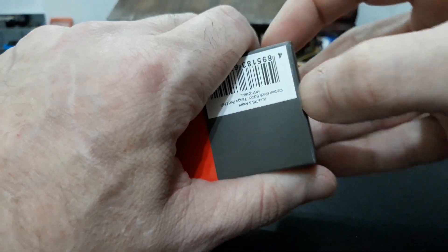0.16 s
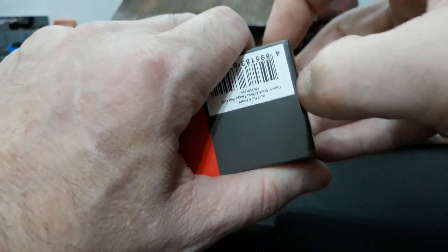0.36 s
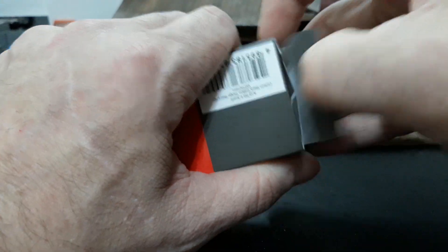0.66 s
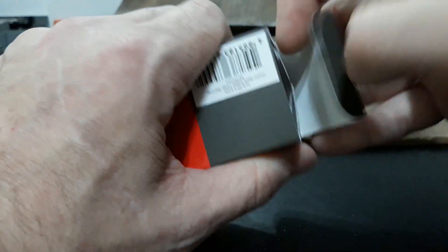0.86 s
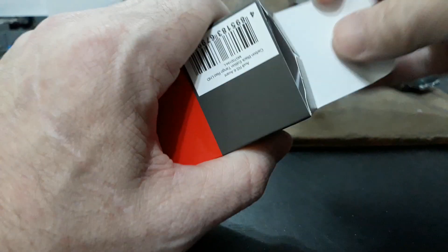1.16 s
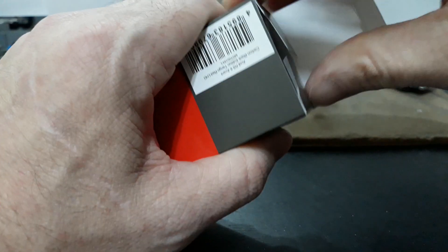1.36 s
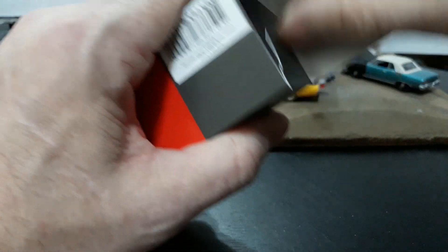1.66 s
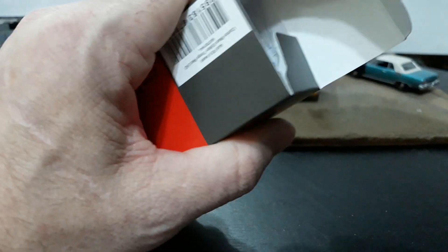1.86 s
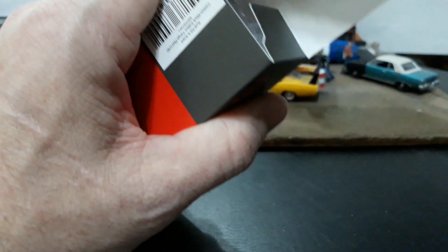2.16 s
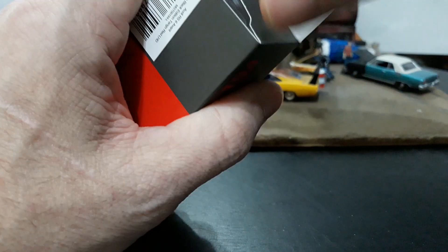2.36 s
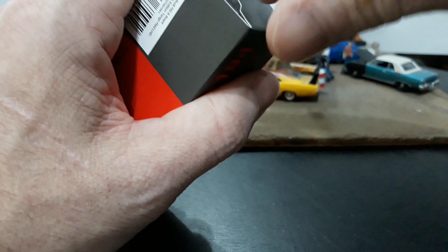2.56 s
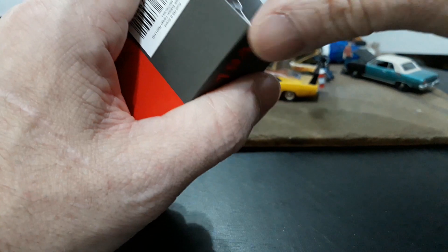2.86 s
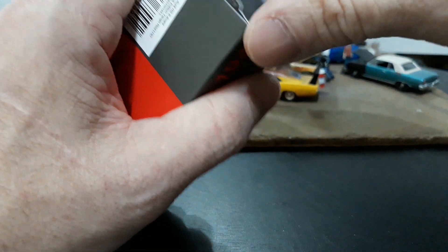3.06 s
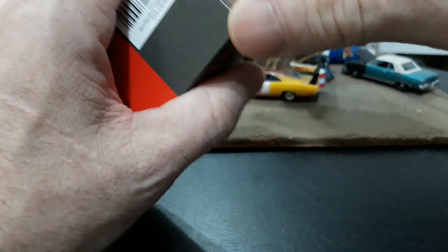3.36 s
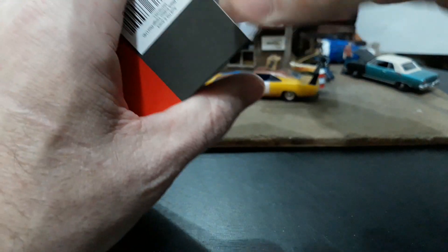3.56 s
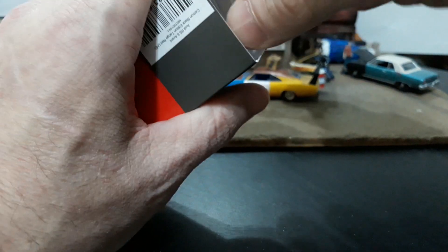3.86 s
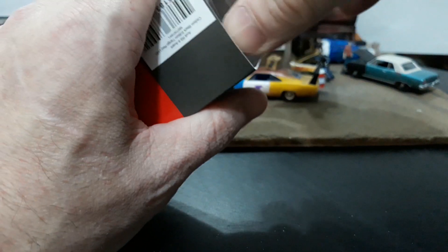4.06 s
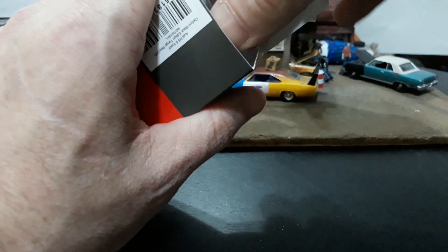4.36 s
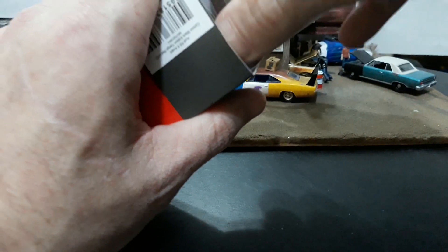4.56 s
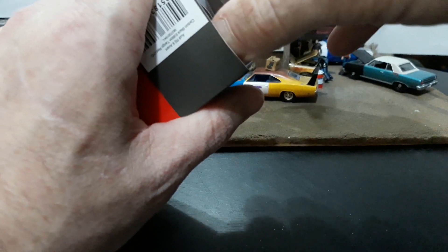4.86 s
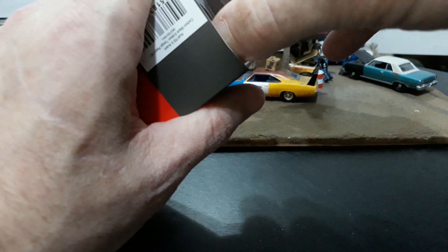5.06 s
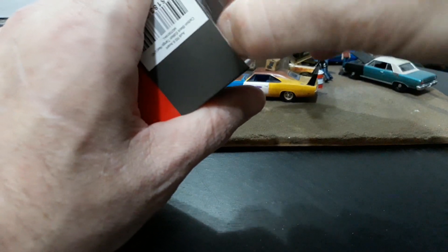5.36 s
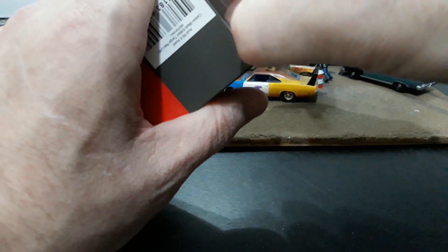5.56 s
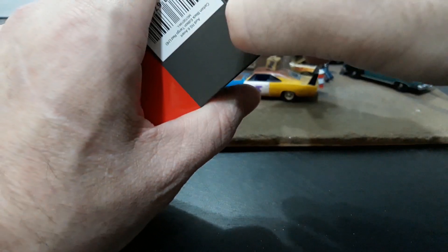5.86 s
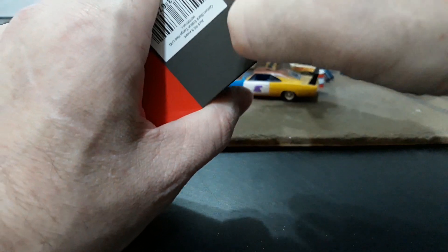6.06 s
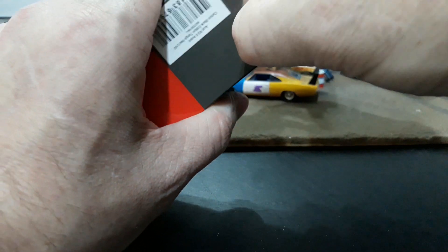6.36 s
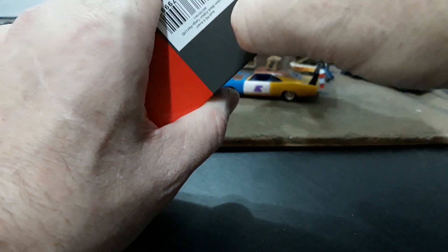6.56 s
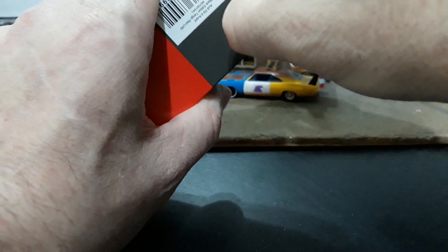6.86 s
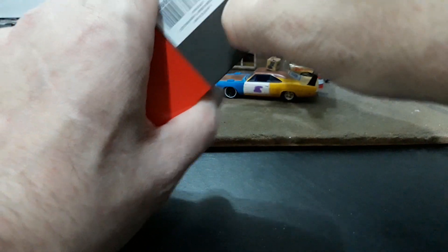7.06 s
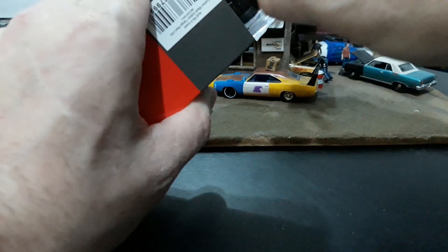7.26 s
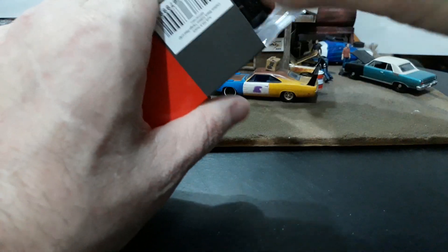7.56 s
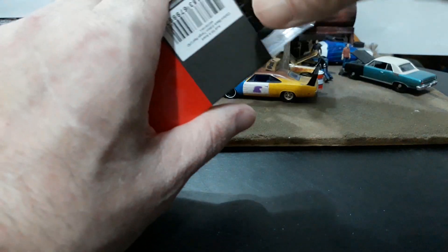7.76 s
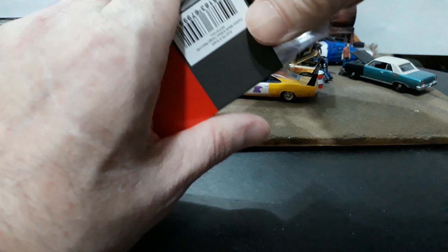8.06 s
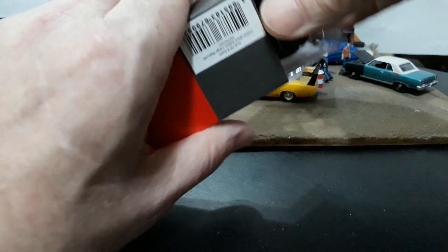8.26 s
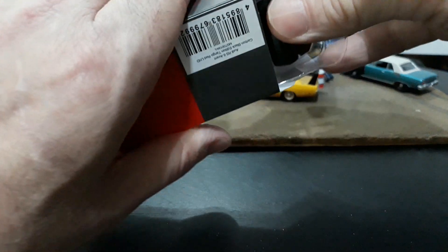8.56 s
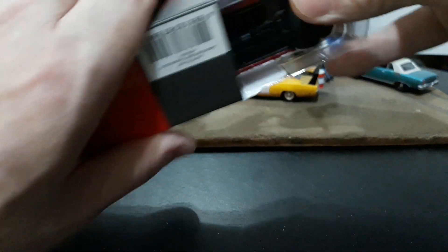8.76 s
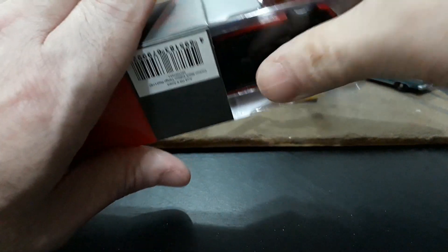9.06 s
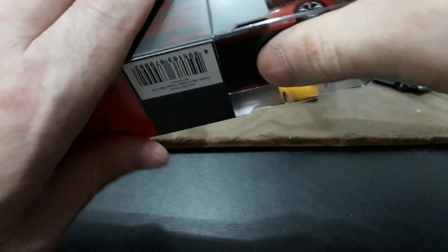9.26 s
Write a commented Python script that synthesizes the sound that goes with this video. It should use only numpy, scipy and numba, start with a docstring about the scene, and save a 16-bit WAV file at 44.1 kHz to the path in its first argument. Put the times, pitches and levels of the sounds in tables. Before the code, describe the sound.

A low, gently wavering hum and faint room hiss sit beneath close handling of a small cardboard box. Soft rubbing swells to a sharp bright snap at 0.5 s, followed by a tight cluster of cracks and a short squeaky scrape until 0.7. Quieter rustling and ticks follow, with a hard snap at 2.05 and a duller, hollow pop at 3.4. Light grainy rubbing and creaks lead to a loud boxy snap at 4.67 and a brighter one at 5.06, with thin squeaks just after. From about 6.4 to 7.1 the scraping grows rough and dense with crackles and knocks, ending in a strong snap at 7.1 and another at 7.36. Smaller plastic clicks continue around 7.8. From 8.3 lower, hollow sliding swells with faint squeaks as the tray is pulled, peaking near 8.8, then scattered ticks until 9.4. The room adds only a short, faint tail.

```python
"""A low wavering hum and a faint room hiss come first, with soft rubbing on card that soon swells.
Hands open a small cardboard box close to a phone and pull a plastic tray out of it, in a quiet furnished room.
Flaps and plastic snap as short noise bursts; fingers and tray rub the card in stick-slip grains.
Snaps and rubbing ring the resonances of the hollow box; dragged edges squeak as narrow gliding noise bands."""
import sys
import numpy as np
from scipy import signal
from scipy.fft import rfft, irfft
from scipy.io import wavfile
from scipy.ndimage import uniform_filter1d, minimum_filter1d
from numba import njit

SR = 44100
rng = np.random.default_rng(int(sys.argv[2]) if len(sys.argv) > 2 else 0)


def materialize(psi):
    """Save the field psi as 16-bit PCM at rate SR to the path in sys.argv[1].

    A 1-D psi becomes a single channel; in a 2-D psi each row is a channel.
    """
    bounded = np.clip(np.atleast_2d(psi).T, -1, 1)
    quanta = np.round(bounded * 32767).astype(np.int16)
    wavfile.write(sys.argv[1], SR, quanta)


N = 414981  # length in samples


def undb(db):
    """Amplitude gain of a level in dB."""
    return 10 ** (np.asarray(db) / 20)


def unit(x):
    """Scale to rms 1."""
    return x / np.sqrt(np.mean(x ** 2))


def curves(table):
    """Columns of a table joined by straight lines, one value a sample."""
    times, *columns = np.transpose(table)
    return [np.interp(np.arange(N) / SR, times, column) for column in columns]


def walk(rate):
    """Random drift: levels held 1 / rate s, slewed twice, with rms 1."""
    hold = int(SR / rate)
    steps = np.repeat(rng.standard_normal(N // hold + 1), hold)
    return unit(uniform_filter1d(uniform_filter1d(steps, hold), hold)[:N])


@njit
def svf(x, hz, width):
    """State-variable band-pass with a moving centre, gain 1 at the centre."""
    y, band_state, low_state = np.empty(len(x)), 0., 0.
    for i in range(len(x)):
        g, damping = np.tan(np.pi * hz[i] / SR), width[i] / hz[i]
        v = (band_state + g * (x[i] - low_state)) / (1 + g * (g + damping))
        band_state, low_state, y[i] = 2 * v - band_state, low_state + 2 * g * v, damping * v
    return y


def band(x, hz, width):
    """Band-pass at a fixed or moving centre."""
    one = np.ones(len(x))
    return svf(x + 1e-18, np.clip(hz * one, 20, .45 * SR), width * one)


def band_twice(x, hz, width):
    """The same band-pass twice, for steeper skirts."""
    return band(band(x, hz, width), hz, width)


def fine(x, hz=6500):
    """Only the top treble, falling towards the top, with two small bright resonances."""
    high_pass = signal.butter(3, hz, "high", fs=SR, output="sos")
    top = signal.sosfilt(high_pass, band(band(x, 8100, 8800), 8000, 16000))
    return top + 0.37 * band(x, 9350, 1200) + 0.43 * band(x, 14000, 1600)


# spectrum of the room hiss: (f/Hz, relative level/dB)
HISS_SPECTRUM = [(20, -43), (60, -17), (110, -7), (220, -9), (600, -9), (1800, -44.5), (3300, -34.5),
                 (5000, -26), (16000, -63)]
HISS_DB = -55.5  # rms


def room_hiss():
    """Steady noise shaped by a spectrum drawn over log frequency."""
    hz = np.fft.rfftfreq(N, 1 / SR) + 1
    shape_hz, shape_db = np.transpose(HISS_SPECTRUM)
    gain = undb(np.interp(np.log(hz), np.log(shape_hz), shape_db))
    return undb(HISS_DB) * unit(irfft(rfft(rng.standard_normal(N)) * gain, N))


# hum tones: (f/Hz, rms level before waver and swell/dB, level waver/dB, pitch waver/Hz)
HUM_TONES = [(98.8, -60, 1.5, .4), (116, -58, 2.5, .6)]
# slow swell of the whole hum: (t/s, level/dB)
HUM_SWELL = [(0, -3), (1.3, -4), (2, 0), (3.7, 3), (5.6, -3), (7.2, 2.5), (9.41, 1.5)]


def low_hum():
    """Two low sine tones, each wavering in level and pitch, swell slowly together."""
    hum = np.zeros(N)
    for hz, db, waver_db, drift_hz in HUM_TONES:
        level = undb(db + waver_db * walk(13.0))
        phase = 2 * np.pi * np.cumsum(hz + drift_hz * walk(4.1)) / SR
        hum += level * np.sqrt(2) * np.sin(phase)
    return hum * undb(curves(HUM_SWELL)[0])


# bands of the room tail: (f/Hz, time to fall 60 dB/s, relative level/dB)
ROOM_BANDS = [(494, 0.36, -22.5), (1440, 0.36, -26), (4000, 0.33, -15.5), (10800, 0.22, -19.5)]


def room(x):
    """Diffuse tail that swells in over 11 ms and dies faster in the treble."""
    t = np.arange(SR // 2) / SR
    tail = np.zeros(len(t))
    for hz, t60, db in ROOM_BANDS:
        noise = unit(band(rng.standard_normal(len(t)), hz, 0.84 * hz))
        tail += undb(db) * noise * undb(-60 * t / t60) / np.sqrt(t60 * SR / 14)
    return signal.fftconvolve(x, tail * np.clip(t / 0.011, 0, 1) ** 2)[:N]


# resonances of the box walls and cavity: (f/Hz, width/Hz, level/dB)
BOX_MODES = [(182, 115, -6), (332, 80, 0), (503, 111, -1), (696, 101, -1), (883, 107, -7.5),
             (1172, 130, -3.5), (1610, 125, -4.5), (2155, 80, -18), (2530, 30, -8.5), (1961, 383, -2),
             (2190, 1470, -12.5)]


def box(push):
    """The walls and the cavity ring after every push, with polarity alternating in table order."""
    return sum((-1) ** k * undb(db) * band(push, hz, width)
               for k, (hz, width, db) in enumerate(BOX_MODES))


# edges that squeak as they drag: (t/s, length/s, start f/Hz, end f/Hz, nominal level/dB)
SQUEAKS = [(0.509, 0.086, 3750, 3700, -42.5), (0.623, 0.094, 5100, 4700, -33.5),
           (0.68, 0.0079, 5930, 5540, -6.5), (0.698, 0.081, 5900, 5700, -54),
           (0.705, 0.069, 3200, 3310, -38), (0.689, 0.015, 4280, 4360, -22.5),
           (0.698, 0.13, 4350, 4360, -45), (4.07, 0.09, 5350, 5300, -54), (5.069, 0.034, 3950, 4030, -32),
           (5.098, 0.11, 4770, 5130, -37), (5.194, 0.049, 5000, 5100, -34.5),
           (5.248, 0.07, 4900, 5220, -33.5), (6.522, 0.033, 3300, 2860, -29),
           (8.297, 0.15, 2330, 2500, -41), (8.648, 0.16, 2400, 2390, -37), (8.62, 0.15, 1750, 1750, -45)]


def squeaks():
    """A dragged edge slips at a nearly even rate: a rough narrow tone with weaker, wider overtones."""
    out = np.zeros(N)
    noise = rng.standard_normal((len(SQUEAKS), 8192))
    for (start, length, start_hz, end_hz, db), grit in zip(SQUEAKS, noise):
        grit = grit[:int(length * SR)]
        hz = np.linspace(start_hz, end_hz, len(grit))
        # pitch ratio, width as a share of the main pitch, gain
        tone = sum(gain * unit(band_twice(grit, ratio * hz, share * hz))
                   for ratio, share, gain in ((1, 0.12, 0.81), (1.85, .25, 0.35), (2.8, 0.56, 0.2)))
        chatter = 1 + 0.54 * np.sin(2 * np.pi * 110 * np.arange(len(grit)) / SR)
        at = int(start * SR)
        out[at:at + len(grit)] += undb(db) * tone * chatter * signal.windows.tukey(len(grit), .6)
    return out


# strokes of fingers, flaps and tray over the card:
# (peak t/s, rise/s, fall/s, box ring level/dB, rasp level/dB); rise and fall last at least 5 ms
STROKES = [(0.232, 0.24, 0.53, -55, -65), (0.528, 0.048, 0.063, -27.5, -32), (0.692, 0.23, 0.083, -29, -29),
           (0.784, 0.064, 0.78, -45.5, -47.5), (1.197, 0.66, 0.076, -58, -52.5),
           (1.499, 0.43, 0.13, -47.5, -48), (1.626, 0.26, 0.16, -41.5, -48.5),
           (1.745, 0.13, 0.33, -43, -40), (1.881, 0.2, 0.54, -49, -39.5), (2.065, 0.12, 0.46, -40, -44),
           (2.258, 0.24, 0.084, -43, -39.5), (2.42, 0.14, 0.25, -50, -47.5),
           (2.699, 0.016, 0.28, -37.5, -41.5), (2.925, 0.043, 0.18, -35.5, -42),
           (3.04, 0.02, 0.24, -42, -42), (3.149, 0.075, 0.079, -42.5, -43), (3.293, 0.2, 0.23, -53, -46),
           (3.422, 0.039, 0.39, -48, -45), (3.836, 0.36, 0.61, -45.5, -44),
           (4.275, 0.65, 0.19, -46.5, -42.5), (4.401, 0.14, 0.14, -36, -40),
           (4.59, 0.34, 0.094, -42.5, -43.5), (4.68, 0.082, 0.21, -27, -30),
           (5.078, 0.071, 0.35, -42, -38.5), (5.32, 0.46, 0.2, -47.5, -44), (5.423, 0.036, 1, -46.5, -59),
           (5.542, 0.025, 0.22, -62, -41), (5.771, 0.074, 0.22, -36.5, -43.5),
           (5.927, 0.094, 0.09, -42.5, -43.5), (6.024, 0.096, 0.24, -38, -46),
           (6.087, 0.014, 0.43, -33.5, -38), (6.319, 0.016, 0.58, -38, -41),
           (6.38, 0.025, 0.11, -31.5, -32), (6.516, 0.15, 0.41, -30.5, -33.5), (6.705, 0.19, 1.2, -36, -39),
           (7.086, 0.24, 0.32, -24.5, -26.5), (7.388, 0.23, 0.8, -62, -46), (7.673, 0.15, 0.09, -45, -43.5),
           (7.817, 0.07, 0.11, -43.5, -34.5), (8.013, 0.24, 0.33, -39.5, -39),
           (8.156, 0.061, 0.39, -54, -41), (8.28, 0.068, 4.8, -37.5, -41), (8.79, 1.32, 0.19, -27, -34),
           (8.886, 0.072, 0.034, -42, -30), (9.094, 0.15, 0.18, -45, -34),
           (9.199, 0.015, 0.48, -33.5, -33.5)]
STROKE_DEPTH_DB = 34  # a stroke gains this much in its rise time and loses it in its fall time
RESTING_RING_DB, RESTING_RASP_DB = -62, -70  # hands that only hold the box


def stroke_levels():
    """Ring and rasp levels in dB: each stroke climbs to its peak and dies away, over the resting hands."""
    t = np.arange(0, N, 64) / SR
    peak, rise, fall, ring_db, rasp_db = np.transpose(STROKES)[:, :, None]
    before, after = (peak - t) / np.maximum(rise, .005), (t - peak) / np.maximum(fall, .005)
    shape_db = -STROKE_DEPTH_DB * np.maximum(before, after)
    levels = []
    for db, rest_db in ((ring_db, RESTING_RING_DB), (rasp_db, RESTING_RASP_DB)):
        power = np.sum(undb(db + shape_db) ** 2, axis=0) + undb(rest_db) ** 2
        levels.append(np.interp(np.arange(N) / SR, t, 10 * np.log10(power)))
    return levels


# how the grip colours the rubbing: (t/s, mean contact f/Hz, mean rasp f/Hz,
# grain spread before its limits/dB, fine hiss level over the rasp/dB)
GRIP = [(0, 1270, 4630, 7.5, 2), (.62, 1206, 4660, 2, -9), (.9, 1200, 4400, 0.5, -1.5),
        (1.25, 1244, 4460, 0.5, -2), (1.8, 965, 4150, 3, -8.5), (2.1, 1000, 4700, 4, -2),
        (2.6, 1046, 4150, -4.5, -11), (2.75, 1500, 2200, -2, -8), (2.95, 800, 2400, -2, -16),
        (3.05, 1500, 3080, -2, -3.5), (3.2, 1060, 3500, 4.5, -4), (3.5, 940, 2960, -15.5, -8),
        (3.8, 1120, 4940, 1.5, -9.5), (4.25, 1170, 4050, 3, -7.5), (4.5, 1405, 4700, 6, -8),
        (4.7, 1224, 2840, 15.5, -11.5), (5.1, 1200, 4180, 1.3, 0), (5.3, 1250, 4790, -3, 0.5),
        (5.56, 1200, 5040, 2.5, -2), (5.8, 1230, 4450, 5.5, -13), (6.12, 1200, 5900, 1.5, -5),
        (6.35, 1185, 2770, 3.5, -5.5), (6.55, 1270, 6300, 7.5, -8.5), (7.1, 1170, 2430, 2, -7),
        (7.5, 1036, 4530, 1, -10), (8.4, 1067, 4160, 3.5, -14.5), (8.7, 767, 4130, 0.8, -10),
        (8.88, 940, 4170, 2, -10.5), (9.1, 825, 4150, 7, -10), (9.41, 1114, 4840, 0.5, -8)]
SLIPS_PER_S, SLIP_S = 400, 0.0023  # mean rate and decay time of the slips


def rubbing():
    """Surfaces stick and slip: dense grains of uneven size, in clusters, scrape the box."""
    ring_db, rasp_db = stroke_levels()
    contact_hz, rasp_hz, spread_db, hiss_db = curves(GRIP)
    spread_db = np.clip(spread_db, .5, 3.2)
    contact_hz = contact_hz * undb(1.0 * walk(14))  # the touching spot wanders over the card
    sizes = np.minimum(rng.exponential(size=N), 2.5)
    slips = (rng.random(N) < SLIPS_PER_S / SR) * (undb(spread_db * sizes) - 1)
    smear = signal.lfilter([1], [1, -np.exp(-1 / (SLIP_S * SR))], slips)  # every slip lasts a moment
    force = (.3 + smear) * undb(.5 * spread_db * walk(45))
    force = force / np.sqrt(uniform_filter1d(force ** 2, size=6144))  # strokes set the slow level
    low, mid, high, top = force * rng.standard_normal((4, N))
    ring = box(band_twice(low, contact_hz, .75 * contact_hz) + .05 * low)
    edge = band(high, rasp_hz * (1 + .04 * walk(12)), .2 * rasp_hz)
    rasp = 1.26 * edge + 1.095 * band_twice(mid, 2060, 2000) + 1.19 * box(mid)
    layers = ((ring, ring_db), (rasp, rasp_db), (fine(top), rasp_db + hiss_db))
    return sum(undb(db + .5 * spread_db * walk(25)) * unit(x) for x, db in layers)


# small creaks and ticks of the strained wall:
# (t/s, crack peak level/dB, box ring peak level/dB, tick peak level/dB)
CREAKS = [(0.458, -38, -48, -37), (0.833, -35, -30.5, -29), (0.868, -37, -32.5, -25),
          (0.886, -28, -38, -36), (1.156, -37, -34.5, -33), (1.198, -39, -37, -34),
          (1.312, -36.5, -45, -36.5), (1.851, -39, -26.5, -27), (1.898, -37, -29, -30),
          (2.093, -31, -30, -35), (2.124, -23, -26, -20), (2.139, -32, -38, -28),
          (2.198, -24.5, -29.5, -24), (2.263, -27.5, -29.5, -23.5), (2.553, -34, -35.5, -34.5),
          (2.678, -22, -33, -40), (2.787, -29.5, -28.5, -36), (2.901, -40, -30, -33),
          (3.169, -23.5, -29, -29), (3.552, -34.5, -32.5, -32.5), (3.726, -33, -33, -33),
          (3.822, -37, -31, -28), (3.84, -26, -29.5, -36), (3.943, -32, -29.5, -31), (4.126, -29, -34, -32),
          (4.199, -31.5, -36, -33), (4.32, -47, -30.5, -55), (4.352, -27, -48, -31),
          (4.381, -33, -28.5, -37), (4.395, -31, -38, -35), (4.569, -44, -31, -43),
          (4.591, -34, -26.5, -47), (4.633, -32, -55.5, -31), (5.039, -41, -23, -35),
          (5.626, -41, -29, -63), (5.728, -32, -29, -37), (5.796, -25, -32.5, -41), (5.882, -28, -34, -36),
          (6, -30, -35, -39), (6.026, -24, -19, -27), (6.039, -28, -23, -28), (6.179, -22, -27, -24.5),
          (6.209, -28, -27, -38), (6.259, -27, -26.5, -31), (6.443, -17, -18, -38),
          (6.473, -13.5, -18.5, -27), (6.49, -28, -27, -28), (6.496, -20, -8.5, -14), (6.52, -16, -38, -28),
          (6.554, -28, -28, -40), (6.564, -23, -18, -28), (6.576, -15.5, -17, -36), (6.608, -21, -15, -25),
          (6.622, -18.5, -18.5, -41), (6.669, -21, -18.5, -21.5), (6.689, -24, -21, -38),
          (6.703, -21, -14.5, -30), (6.718, -26, -23, -29), (6.743, -18, -29, -32),
          (6.774, -20.5, -28, -31), (6.802, -20.5, -22, -25), (6.826, -19.5, -20, -20.5),
          (6.868, -18, -17, -23.5), (6.896, -21, -19, -22.5), (6.95, -21, -18, -19), (6.993, -19, -18, -39),
          (7.015, -18, -17, -26), (7.244, -29, -28.5, -28), (7.559, -34, -36, -42),
          (7.599, -27.5, -26.5, -35), (7.649, -30, -31, -31), (7.742, -28.5, -17.5, -40),
          (7.959, -24, -28, -41), (8.13, -23.5, -31, -33), (8.411, -28, -22, -27), (8.439, -25, -43, -31),
          (8.452, -18.5, -25, -27), (8.49, -21, -22, -27), (8.521, -18, -16.5, -34), (8.561, -19, -22, -29),
          (8.862, -25, -30, -21), (8.942, -59, -30, -50), (9.334, -26, -46, -17), (9.355, -16, -39, -19)]
CREAK_HZ, CREAK_CONTACT_HZ = 2596, 1207  # median crack pitch, contact pitch
CREAK_SCATTER = 0.21  # random spread of the crack pitch, as a share
# snaps of card and plastic:
# (t/s, crack peak level/dB, box ring peak level/dB, tick peak level/dB, crack f/Hz, contact f/Hz)
SNAPS = [(0.213, -26.5, -29.5, -31, 2140, 1320), (0.511, -2, -12, -5.5, 5070, 894),
         (0.621, -21, -24, -36, 5150, 1170), (0.665, -25, -27, -23, 4970, 1160),
         (0.676, -10, -21, -26, 3250, 1200), (0.681, -4, -34, -21, 5730, 1210),
         (0.688, -7, -18, -29, 4300, 754), (0.694, -10, -42, -25, 4420, 1210),
         (1.214, -26.5, -29, -54, 5100, 1280), (1.834, -27, -31, -30, 4540, 1150),
         (1.872, -17.5, -25, -21, 3860, 550), (1.935, -21.5, -36, -46, 3700, 1130),
         (1.997, -20, -58, -53, 4400, 1600), (2.045, -0.5, -30, -4, 4800, 1580),
         (2.112, -23, -26.5, -21, 4900, 1180), (2.179, -23, -26, -51, 3840, 1130),
         (2.408, -25, -30.5, -28, 4500, 1170), (2.671, -21, -19.5, -40, 4750, 1090),
         (2.913, -14, -19.5, -32, 2350, 860), (3.16, -37, -20, -37, 1990, 960),
         (3.401, -8.5, -14.5, -31, 1490, 730), (4.648, -28, -18, -19, 2400, 1130),
         (4.665, -1.5, -3.5, -3, 2640, 1356), (5.058, -1.5, -13, 0.5, 3840, 1180),
         (5.396, -21, -24, -15, 2770, 1190), (7.065, -9, -14.5, -42, 2080, 1830),
         (7.087, -21, -26, -31, 2630, 1190), (7.109, -1.5, -2.5, -13, 2700, 1570),
         (7.225, -11.5, -23, -16, 4460, 1480), (7.228, -14.5, -23, -14, 4600, 1300),
         (7.364, -5, -7.5, -9, 3200, 1170), (7.366, -24, -16.5, -40, 2350, 440),
         (7.385, -40, -20.5, -40, 3020, 1025), (7.676, -37, -24.5, -27, 2340, 1130),
         (7.807, -14, -48, -18.5, 4740, 1520), (7.87, -15, -15.5, -22.5, 2430, 1370),
         (7.889, -20, -18.5, -21, 4450, 755), (7.923, -23, -32, -26, 3660, 523),
         (8.078, -18.5, -22, -35, 3700, 523), (8.594, -13.5, -23.5, -55, 2460, 710),
         (8.788, -19, -29, -23, 4230, 730), (8.834, -19, -16.5, -25, 2030, 1810),
         (8.981, -23.5, -24, -33, 3520, 1160), (9.038, -31, -25, -36, 3310, 897),
         (9.069, -25, -21, -34, 3000, 1295), (9.078, -16, -20.5, -21.5, 4040, 430),
         (9.194, -32, -25, -27, 4800, 960), (9.121, -34, -21.5, -24, 4520, 1150),
         (9.258, -17, -26, -33, 2760, 1920), (9.302, -18.5, -34, -30, 4860, 1194),
         (9.326, -18, -41, -32, 2750, 1500), (9.387, -12, -24.5, -13.5, 4800, 1130)]


def snaps():
    """Splintering bursts crack, tick and knock the box: snaps at listed pitches, creaks scattered round one."""
    size = 2048
    t, out = np.arange(size) / SR, np.zeros(N + size)
    pitch = CREAK_HZ * np.exp(CREAK_SCATTER * rng.standard_normal(len(CREAKS)))
    # the last three columns: attack s, decay s, width of the contact as a share of its pitch
    events = [(*row, .00025, .0018, .8) for row in SNAPS]
    events += [(*row, hz, CREAK_CONTACT_HZ, .0003, .003, .4) for row, hz in zip(CREAKS, pitch)]
    noise = rng.standard_normal((len(events), size))
    for event, grit in zip(events, noise):
        start, crack_db, ring_db, tick_db, crack_hz, contact_hz, attack, decay, share = event
        splinter = (1 - np.exp(-t / attack)) * np.exp(-(t / decay) ** 0.74)
        first_break = 1.16 * np.exp(-t / 0.00025)
        burst = grit * (splinter + first_break)
        crack = band(burst, crack_hz, 0.15 * crack_hz) + 0.69 * band(burst, crack_hz, 110)
        crack = crack + 0.37 * band_twice(burst, 2600, 5900)
        ring = box(band_twice(burst, contact_hz, share * contact_hz))
        tick = fine(burst * np.exp(-t / 0.0076))
        parts = ((crack, crack_db), (ring, ring_db), (tick, tick_db))
        at = int(start * SR)
        out[at:at + size] += sum(undb(db) * x / np.abs(x).max() for x, db in parts)
    return out[:N]


def scene():
    """Hands and box near the phone, the room behind them."""
    background = room_hiss() + low_hum()
    near = squeaks() + rubbing() + snaps()
    return (near + room(near) + background)[None]


TOP_HZ = 15600  # upper edge of the sound


def record(dry):
    """A limiter turns the loudest peaks down towards 0.95 of full scale; a steep low-pass cuts the top."""
    gain = np.minimum(1, .95 / (np.abs(dry) + 1e-9))
    gain = uniform_filter1d(minimum_filter1d(gain, size=129), size=128)
    return signal.sosfilt(signal.ellip(12, .2, 95, TOP_HZ, fs=SR, output="sos"), dry * gain)


dry = scene()
out = record(dry)
materialize(out)
```